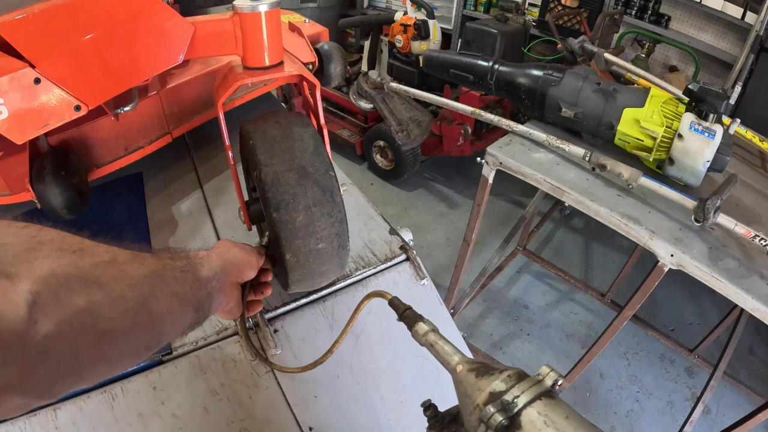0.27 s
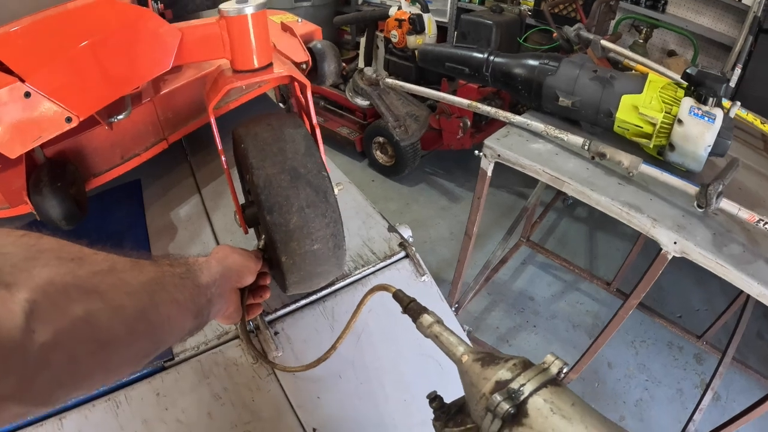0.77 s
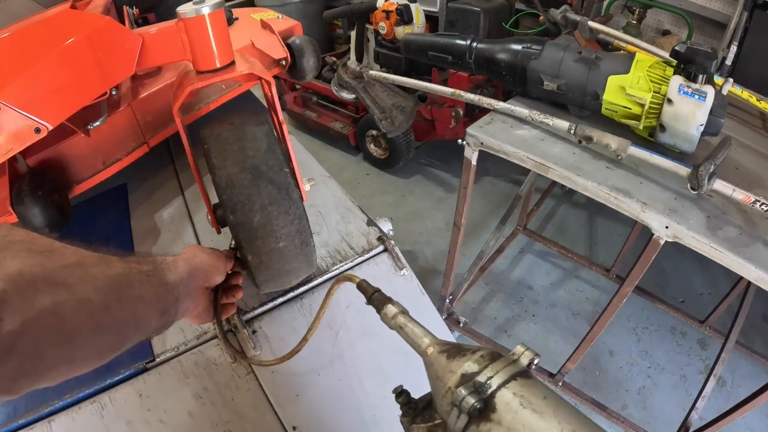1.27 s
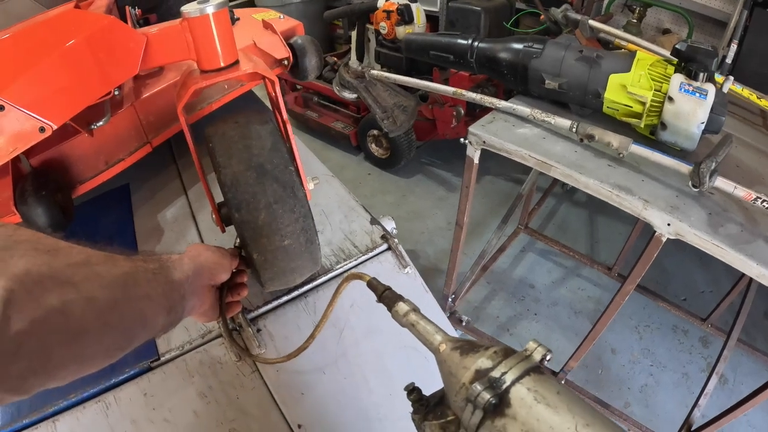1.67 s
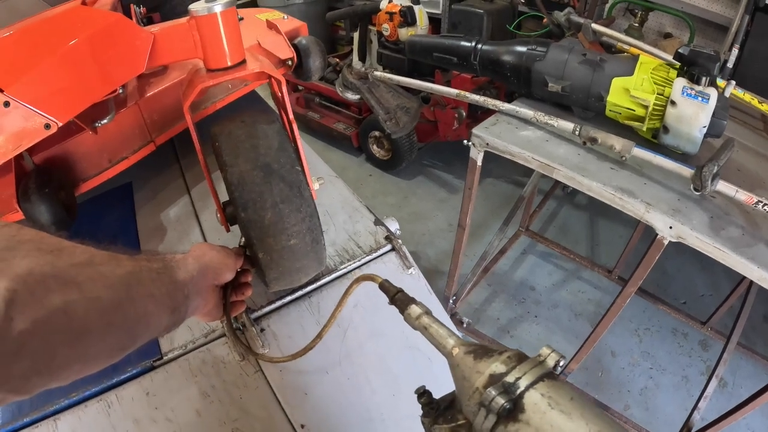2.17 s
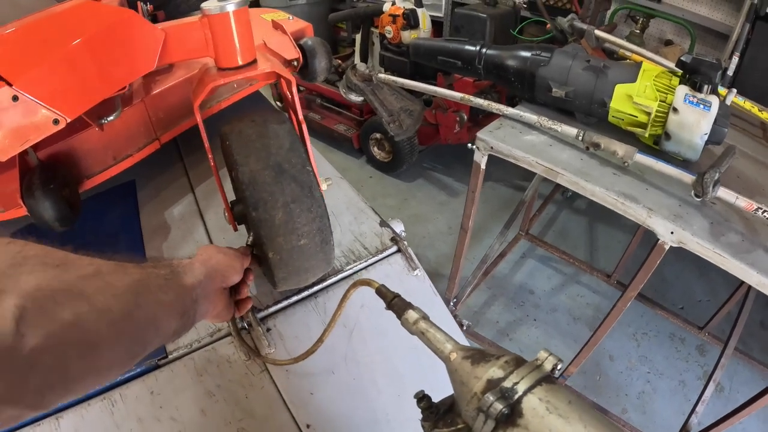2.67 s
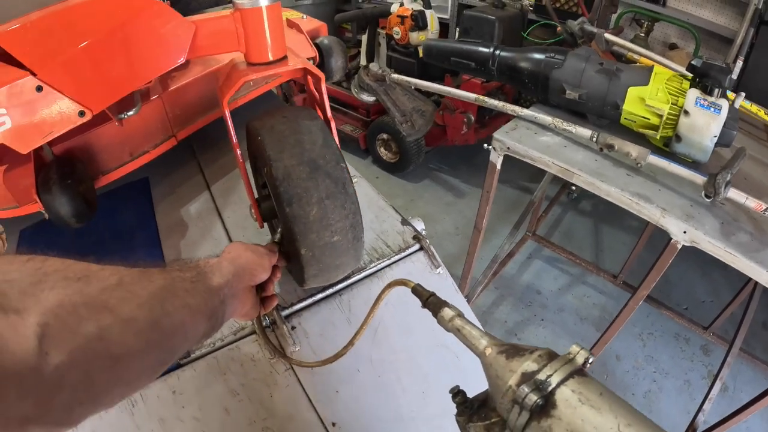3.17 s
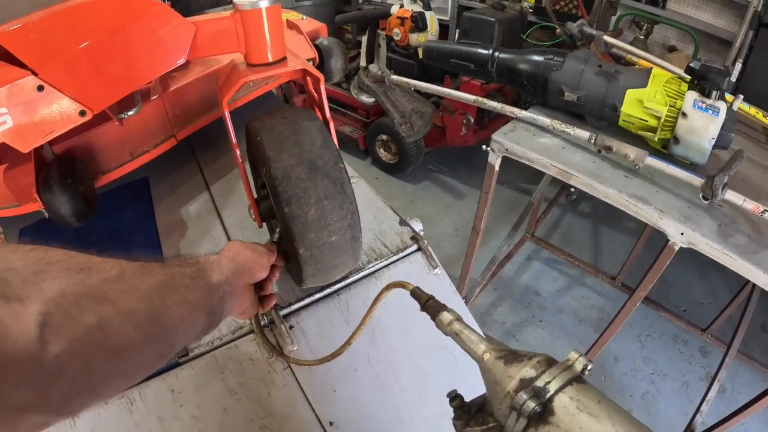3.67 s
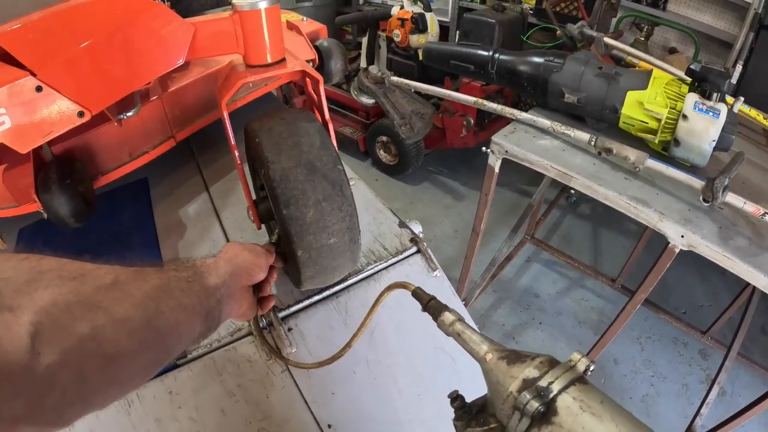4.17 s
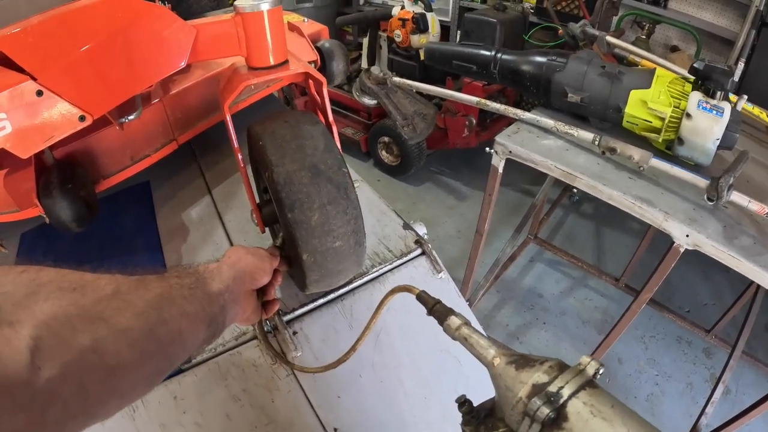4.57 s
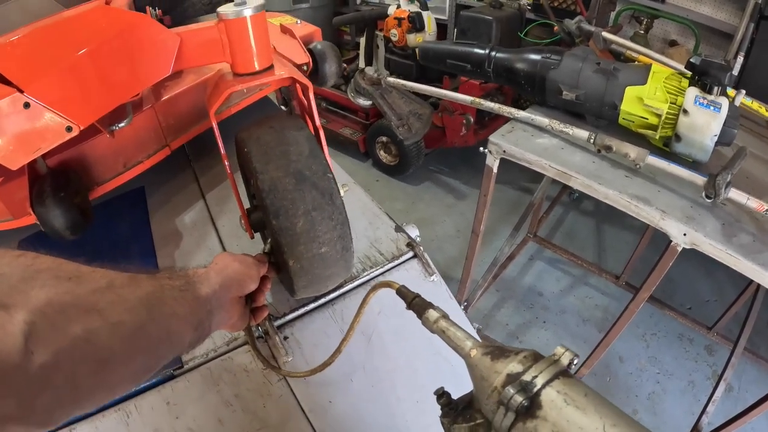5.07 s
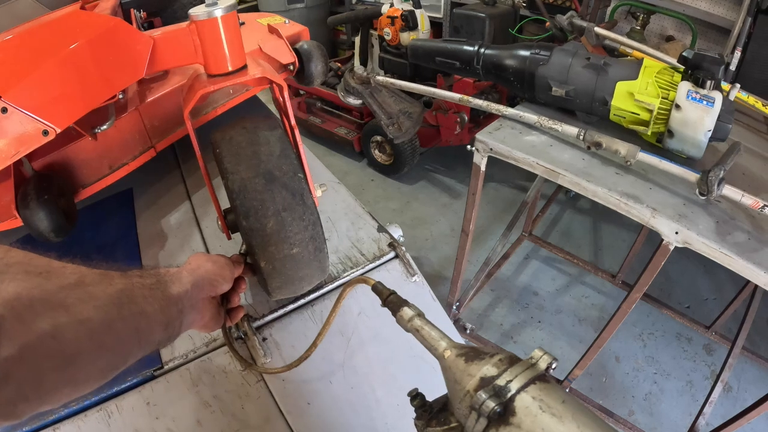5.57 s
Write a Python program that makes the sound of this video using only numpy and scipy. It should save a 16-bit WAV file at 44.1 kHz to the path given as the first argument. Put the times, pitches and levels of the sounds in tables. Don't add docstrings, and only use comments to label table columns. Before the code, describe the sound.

An air-driven grease gun is pulsed seven times up close in a repair shop, each pull a sharp crack, each release a fading air blast.

```python
import sys
import numpy as np
from scipy import signal
from scipy.fft import rfft, irfft, next_fast_len
from scipy.io import wavfile
from scipy.ndimage import uniform_filter1d

SR = 44100
rng = np.random.default_rng(int(sys.argv[2]) if len(sys.argv) > 2 else 0)


def level_to_linear(level):
    exponent = np.asarray(level, float) / 20
    return 10 ** exponent


def generate_wav(sig):
    pcm = np.round(np.clip(np.atleast_2d(sig).T, -1, 1) * 32767).astype(np.int16)
    wavfile.write(sys.argv[1], SR, pcm)


N = 256220
T = np.arange(N) / SR


def filt(x, kind, hz, order=2):
    return signal.sosfilt(signal.butter(order, hz, kind, fs=SR, output="sos"), x)


def unit(x):
    return x / np.sqrt(np.mean(x ** 2))


def curve(points, f):
    hz, db = np.transpose(points)
    return np.interp(np.log(f), np.log(hz), db)


def noise(colour, lifts=()):
    f = np.fft.rfftfreq(N, 1 / SR) + 1
    db = curve(colour, f)
    for hz, width, lift_db in lifts:
        db = db + lift_db / (1 + (2 * (f - hz) / width) ** 2)
    return irfft(rfft(rng.standard_normal(N)) * level_to_linear(db), N)


def flicker(rate, spread_db):
    return level_to_linear(spread_db * unit(filt(rng.standard_normal(N), "low", rate)))


def swell(times, levels_db):
    return level_to_linear(np.interp(T, times, levels_db)) * (T > times[0]) * (T < times[-1])


def bump(centre, half):
    return np.exp(-((T - centre) / half) ** 2)


def add(out, s, wave):
    i = int(s * SR)
    out[i:i + len(wave)] += wave[:N - i]


def ring(modes, db, scatter_db=-2.0, detune=.05):
    t, wave = T[:SR // 4], 0
    chance = rng.standard_normal((len(modes), 2))
    for (hz, mode_db, t60), (louder, sharper) in zip(modes, chance):
        tone = np.sin(2 * np.pi * hz * (1 + detune * sharper) * t)
        wave = wave + level_to_linear(mode_db + scatter_db * louder) * tone * level_to_linear(-60 * t / t60)
    return wave * level_to_linear(db) / np.max(np.abs(wave))


def swing(db, start_hz, end_hz, glide, length, phase):
    t = T[:SR // 20]
    turns = end_hz * t + (start_hz - end_hz) * glide * (1 - np.exp(-t / glide))
    fade = np.exp(-(t / length) ** 4) * np.minimum(t / .0003, 1)
    return level_to_linear(db) * np.cos(2 * np.pi * turns - phase) * fade


# frequency in Hz, level in dB per Hz.
SHOP_COLOUR = [(15, -35.5), (25, -8.5), (54, -0.5), (90, -6), (180, -11.5), (250, -12), (360, -17.5),
               (520, -26.5), (700, -33), (1130, -37.5), (1700, -46), (2200, -54.5), (4000, -64),
               (10000, -70.5), (16000, -87)]
# centre in seconds, half length in seconds, rumble lift in dB,
# fan lift in dB.
SWELLS = [
    (.2, 0.12, -7.5, 6),
    (1.97, 0.13, 1.5, 7.5),
    (2.713, .15, 6.5, -1),
    (4.211, 0.41, -2, 5),
    (5.15, 0.191, -0.5, 1.5),
    (5.652, .3, 4.5, 4.5),
]


def shop():
    rumble_db, fans_db = -44, -58.5
    for s, _ in POP_TIMES:
        rumble_db = rumble_db - 10.5 * bump(s + 0.6, 0.25)
    for s, half, rumble_lift, fan_lift in SWELLS:
        rumble_db = rumble_db + rumble_lift * bump(s, half)
        fans_db = fans_db + fan_lift * bump(s, half)
    air = noise(SHOP_COLOUR)
    rumble = unit(filt(air, "low", 680, order=3)) * level_to_linear(rumble_db) * flicker(5.5, 2.6)
    fans = unit(filt(air, "high", 450, order=3)) * level_to_linear(fans_db) * flicker(14, 1.2)
    return rumble + fans


# time in seconds, pitch in Hz, level in dB.
HUM_LOW = [
    (3.001, 79, -50),
    (3.303, 77.9, -50),
    (3.6, 79, -43.5),
    (3.85, 77.7, -40),
    (4.1, 75.8, -55),
    (4.351, 78.6, -49.5),
    (4.699, 78.4, -42),
    (4.9, 78.1, -56),
]
# time in seconds, pitch in Hz, level in dB.
HUM_HIGH = [
    (5.22, 272, -72),
    (5.31, 272, -54),
    (5.42, 274, -55),
    (5.6, 282, -55),
    (5.7, 285, -57),
    (5.81, 285, -63),
]


def motors():
    out, wander = np.zeros(N), flicker(18, 2.6)
    for hum in (HUM_LOW, HUM_HIGH):
        s, hz, db = np.transpose(hum)
        turns = np.cumsum(np.interp(T, s, hz)) / SR
        out += uniform_filter1d(swell(s, db), size=2000) * wander * np.sin(2 * np.pi * turns)
    return out


# band centre in Hz, t60 in seconds.
ROOM_DECAY = [(250, .45), (800, .4), (2000, .36), (4000, .3), (7000, .22), (11000, .16), (15000, .12)]
ROOM_WET = [-18, -12.5, -15, -9, -10.5, -12.5, -13]


def room(x):
    t, tail = T[:SR // 2], 0
    for (hz, t60), wet_db in zip(ROOM_DECAY, ROOM_WET):
        edges = [hz / 1.6, min(hz * 1.59, 19000)]
        band = filt(rng.standard_normal(len(t)), "band", edges, order=4) * level_to_linear(-60 * t / t60)
        tail = tail + level_to_linear(wet_db) * band * np.sqrt(14 / (t60 * SR)) * np.minimum(t / 0.0047, 1)
    return signal.fftconvolve(x, tail)[:N]


# valve opens, piston cracks, barrel thumps, all in seconds.
PULL_TIMES = [
    (.0290, .0500, .0517),
    (.8822, .9040, .9063),
    (1.7410, 1.7662, 1.7693),
    (2.7300, 2.7523, 2.7553),
    (3.5622, 3.5878, 3.5897),
    (4.4260, 4.4503, 4.4531),
    (5.4372, 5.4619, 5.4640),
]
# inrush in dB, crack in dB, thump in dB, leak at the slam in dB.
PULLS = [
    (-18, -6.5, -14.5, -34),
    (-18, -11, -10.5, -34),
    (-19.5, -7.5, -12, -32.5),
    (-18.5, -11.5, -10.5, -33),
    (-19, -8, -13.5, -34),
    (-19.5, -10.5, -11.5, -33.5),
    (-18.5, -13.5, -10.5, -32.5),
]
# frequency in Hz, level in dB.
LEAK_COLOUR = [(88, -30), (150, 3.5), (291, -5.5), (398, -9.5), (534, -12), (716, -11), (1260, -8.5),
               (1450, -13.5), (3550, -5.5), (8400, -16.5), (16000, -34.5)]
# frequency in Hz, width in Hz, lift in dB.
INLET = [(470, 290, 9.5), (1820, 62, -2), (3380, 390, -0.5), (4340, 180, 3.5), (5200, 2000, -1),
         (7300, 260, 2.5)]
LEAK_S = .1285


def leak():
    gain = np.zeros(N)
    for (_, crack, thump), (_, _, _, db) in zip(PULL_TIMES, PULLS):
        shut, low_db = thump + LEAK_S, db - 10
        gain += swell([crack, thump + .002, shut - .006, shut, shut + .01],
                      [-60, db, low_db, low_db + 2.5, -80])
    return gain * unit(noise(LEAK_COLOUR, INLET)) * flicker(60, 0.94)


# frequency in Hz, level in dB per Hz.
TICK_COLOUR = [(120, -18.5), (210, 1.5), (500, -1), (1000, 4.5), (2000, -1), (6000, -20), (9000, -35.5)]


def tick():
    gain, db = np.zeros(N), -39.5
    for _, _, thump in PULL_TIMES:
        shut = thump + LEAK_S
        gain += swell([shut - .002, shut, shut + .008, shut + .045], [-80, db - 4, db - 7, db - 30])
    return gain * unit(noise(TICK_COLOUR))


# frequency in Hz, level in dB.
INRUSH_COLOUR = [(180, -36.5), (300, -8), (1510, -5), (1810, -1), (2650, -8.5), (3350, -1.5), (4020, -8),
                 (6200, -5.5), (8640, -16.5), (15000, -21), (16000, -28.5)]


def inrush():
    gain = np.zeros(N)
    for (s, crack, thump), (db, _, _, _) in zip(PULL_TIMES, PULLS):
        gain += swell([s - .001, s + 0.00084, s + 0.0085, crack, thump, thump + 0.013],
                      [-70, db - 9.5, db - 4.5, db, db - 0.5, -60])
    return gain * unit(noise(INRUSH_COLOUR, INLET)) * flicker(370, 1.0)


# frequency in Hz, level in dB, t60 in seconds.
HEAD = [(620, -8.5, 0.078), (1108, -1.5, 0.05), (1950, 3, 0.019), (2200, -1, 0.028), (3560, -3.5, .012),
        (5220, 0.5, 0.012)]
# frequency in Hz, level in dB, t60 in seconds.
BARREL = [(97, 1.5, 0.19), (128, 10.5, 0.072), (195.4, -3.5, 0.11), (288, 0, 0.14), (450, -5.5, 0.25),
          (495, -10.5, 0.63)]


def piston():
    out = np.zeros(N)
    for (s, crack, thump), (db, crack_db, thump_db, _) in zip(PULL_TIMES, PULLS):
        add(out, s - .0003, swing(db - 5.0, 300, 120, 0.0019, 0.013, -2.0))
        add(out, s + .0055, ring([(3150, 0, 0.026), (3670, -2, 0.017)], db + 3.5, detune=.03))
        add(out, crack - .0002, ring(HEAD, crack_db))
        add(out, thump - .0003, swing(thump_db, 600, 130, .0014, .0054, 1.0))
        add(out, thump + .004, ring(BARREL, thump_db - 15.0))
        add(out, thump + .0019, ring(HEAD, thump_db - 8))
    return out


# centre in seconds, pitch in Hz, level in dB,
# length in seconds.
WHISTLES = [
    (0.388, 2150, -21, .008),
    (3.136, 2200, -16.5, 0.0026),
    (3.951, 1845, -12, .008),
    (4.822, 1840, -17.5, 0.0062),
]


def whistles():
    out = np.zeros(N)
    for s, hz, db, length in WHISTLES:
        out += level_to_linear(db) * bump(s, length) * np.sin(2 * np.pi * hz * T)
    return out


# start in seconds, peak in dB, pitch in Hz.
KNOCKS = [
    (0.342, -13.5, 757),
    (1.22, -14.5, 420),
    (2.052, -18, 492),
    (3.066, -15, 470),
    (3.895, -14.5, 1110),
    (4.767, -6, 853),
    (5.753, -10, 437),
]


def knocks():
    out = np.zeros(N)
    for s, db, hz in KNOCKS:
        add(out, s + .0008, ring([(hz, 0, 0.026)], db - 4.5, detune=0))
    return out


# start in seconds, clack delay in seconds.
POP_TIMES = [
    (.3420, .003),
    (1.2206, .0035),
    (2.0520, .0042),
    (3.0658, .0026),
    (3.8948, .005),
    (4.7652, .003),
    (5.7532, .0026),
]
# pop in dB, clack in dB, boom in dB, slow heave in dB, jet in dB.
POPS = [
    (-17, -8.5, -17, -17, -21.5),
    (-16, -8.5, -16, -14.5, -20.5),
    (-28.5, -7, -14, -19, -21.5),
    (-16.5, -5, -17, -16, -21),
    (-19.5, -8.5, -14, -17, -22),
    (-14.5, -11.5, -14.5, -19, -21),
    (-17.5, -21, -13.5, -13.5, -20.5),
]
# frequency in Hz, level in dB, t60 in seconds.
VALVE = [(548, -3.5, 0.037), (860, -8.5, .025), (1170, -2.5, 0.027), (1800, 3.5, 0.038), (2080, 3.5, 0.016),
         (3460, -3.5, .012)]


def exhaust_valve():
    out = np.zeros(N)
    heave = [(58.7, 0.12, 0.1), (84, 0.87, 0.16)]  # (Hz, dB, t60 s)
    for (s, late), (pop_db, clack_db, boom_db, heave_db, _) in zip(POP_TIMES, POPS):
        add(out, s, swing(pop_db, 330, 260, .002, .0028, 1.7))
        add(out, s + late - .0006, ring(VALVE, clack_db + 2.0))
        add(out, s + 0.0018, -ring(BARREL, boom_db))
        add(out, s + .004, -ring(heave, heave_db, scatter_db=5.0, detune=0.045))
    return out


def patchy(x):
    edges = 300 * 2 ** (np.arange(18) / 3)
    size, k = next_fast_len(N), SR // 200
    spec = rfft(x, size)
    band = np.searchsorted(edges, np.fft.rfftfreq(size, 1 / SR))
    slow = signal.butter(2, 64, fs=200, output="sos")
    walks = signal.sosfilt(slow, rng.standard_normal((len(edges) + 1, N // k + 2)))
    out = np.zeros(N)
    for b, walk in enumerate(walks):
        gain_db = 1.0 * np.interp(T * SR / k, np.arange(len(walk)), unit(walk))
        out += irfft(spec * (band == b), size)[:N] * level_to_linear(gain_db)
    return out


# frequency in Hz, level in dB per Hz.
JET_COLOUR = [(88, -30), (150, -6), (448, -2.5), (979, -8.5), (1210, -6), (1420, -13.5), (1870, -3.5),
              (2310, -2), (2550, -7), (3290, 1.5), (3920, -3), (7620, -6), (10000, -12.5), (14800, -10),
              (16000, -20.5)]
# frequency in Hz, width in Hz, lift in dB.
PORT = [(1150, 1400, 4.5), (1845, 59, 6), (2150, 54, 2), (3300, 77, 2.5), (4490, 66, 8), (6090, 590, 4.5),
        (6870, 47, 3), (7670, 640, 2)]
# level over the jet in dB, choked time in seconds,
# then sag in dB per second, bend in dB per second squared.
BLOW_DOWN = [
    (-5, 0.0071, 69, 197.5),
    (0, 0.045, 86.5, 298.5),
    (-10, 0.031, 40, 448),
    (-19, 0.014, 81, 484.5),
]


def blow_down():
    air = patchy(noise(JET_COLOUR, PORT)) * flicker(430, 0.4)
    core = filt(air, "band", [2500, 9000], order=4)
    roar = unit(filt(air, "low", 1500, order=4))
    middle = filt(air, "band", [1500, 9000], order=4) / np.sqrt(np.mean(core ** 2))
    high = filt(air, "high", 9000, order=4)
    top = unit(filt(high, "low", 12500, order=4))
    finest = unit(filt(high, "high", 12500, order=4))
    out, vent_s, lead_in = np.zeros(N), .257, level_to_linear(-22)
    for (s, _), (_, _, _, _, jet_db) in zip(POP_TIMES, POPS):
        gate = np.interp(T, [s - .012, s - .01, s - .0004, s + .0022, s + .012, s + vent_s, s + vent_s + .02],
                         [0, lead_in / 2, lead_in, 0.77, 1, 1, 0])
        puff = level_to_linear(7.5 * np.exp(-np.abs(T - s) / 0.0064))
        for layer, (db, choked, sag, bend) in zip((roar * puff, middle, top, finest), BLOW_DOWN):
            after = np.clip(T - s - choked, 0, 1)
            out += gate * layer * level_to_linear(jet_db + db - sag * after - bend * after ** 2)
    return out


def housing(top):
    t, out = T[:SR // 20], np.zeros(N)
    rattles = rng.standard_normal((4, len(t))) * level_to_linear(-60 * t / .02)
    for rattle in rattles:
        chance = unit(filt(rng.standard_normal(N), "low", 120))
        out += chance * signal.oaconvolve(top, rattle)[:N]
    return out / np.linalg.norm(rattles)


def scene():
    pull = leak() + tick() + inrush() + piston()
    release = whistles() + knocks() + exhaust_valve() + blow_down()
    gun = pull + release
    mid = shop() + motors() + room(gun) + gun
    top = rfft(mid) * np.clip((np.fft.rfftfreq(N, 1 / SR) - 11200) / 500 + .5, 0, 1)
    scatter = unit(filt(rng.standard_normal(N), "low", 250, order=4))
    side = irfft(top * (.63 + .5j), N) + level_to_linear(0.5) * housing(irfft(top, N))
    side = side + level_to_linear(-39.5) * np.roll(filt(mid, "low", 1500, order=1), 311)
    side = side + level_to_linear(-36.5) * scatter * filt(mid, "high", 400)
    return np.array([mid + side, mid - side])


# frequency in Hz, level under the sound in dB.
SMEAR_COLOUR = [(300, -36.5), (1500, -29.5), (4000, -30), (8000, -15.5), (12000, -30), (14000, -33),
                (16000, -46)]
COARSE_HZ = [1250, 4600, 5250, 6500, 7800, 8600, 11500, 12600]


def smear(x):
    size, f = 2048, np.fft.rfftfreq(2048, 1 / SR) + 1
    window, out = np.sin(np.pi * (np.arange(size) + .5) / size), np.zeros(N)
    under_db = curve(SMEAR_COLOUR, f)
    bands = np.exp(-((f - np.array(COARSE_HZ)[:, None]) / 260) ** 4)
    for i in range(60, N - size, size // 2):
        power = np.abs(rfft(x[i:i + size] * window ** .6)) ** 2
        spread = np.sqrt(uniform_filter1d(power, size=24))
        patches_db = 14 * ((rng.random(len(bands)) < .65) @ bands)
        phases = np.exp(2j * np.pi * rng.random(len(f)))
        out[i:i + size] += window * irfft(spread * level_to_linear(under_db + patches_db) * phases)
    return out


def band_limit(x):
    return signal.sosfilt(signal.butter(12, 16870, fs=SR, output="sos"), x)


def record(dry):
    x = np.tanh(1.2 * dry) / 1.2 + smear(dry.mean(axis=0))
    x = filt(x, "high", 22)
    x = signal.sosfilt(signal.ellip(10, .2, 80, 15900, fs=SR, output="sos"), x)
    return band_limit(x)


dry = scene()
out = record(dry)
generate_wav(out)
```